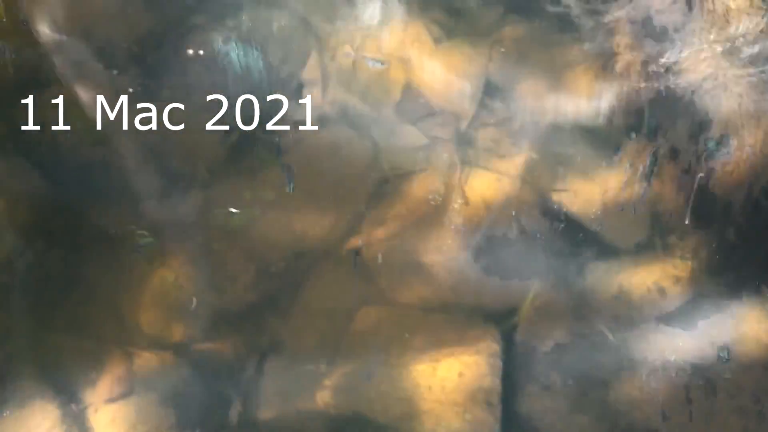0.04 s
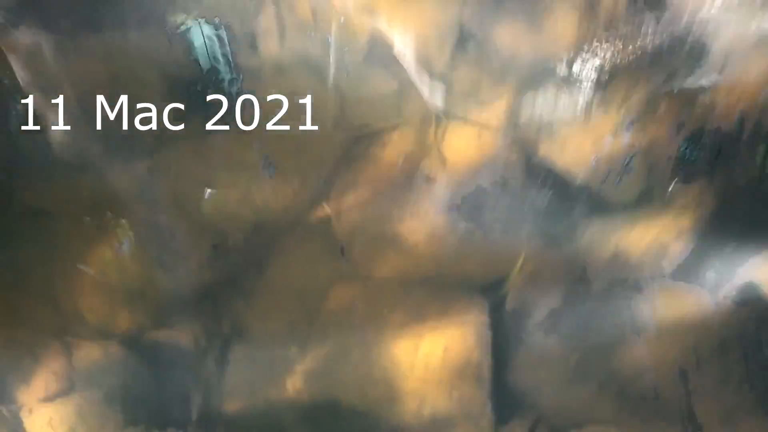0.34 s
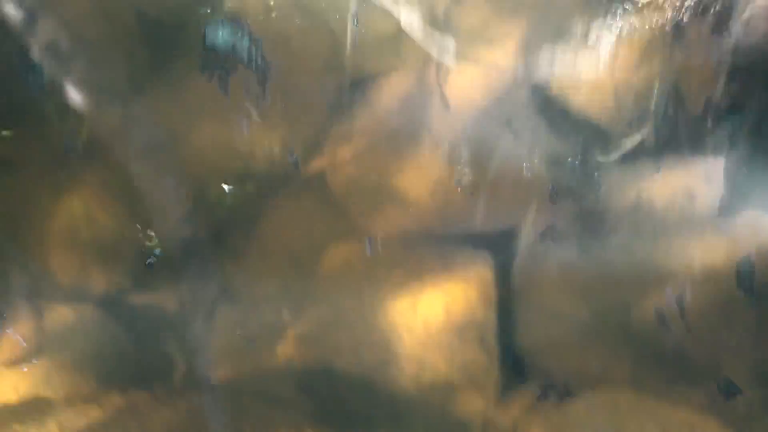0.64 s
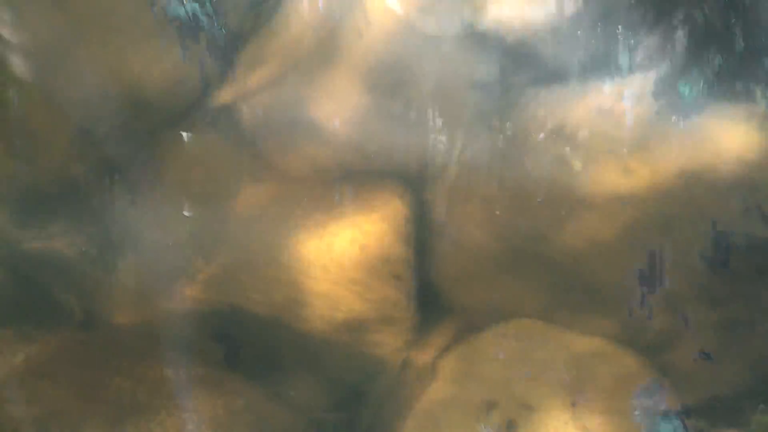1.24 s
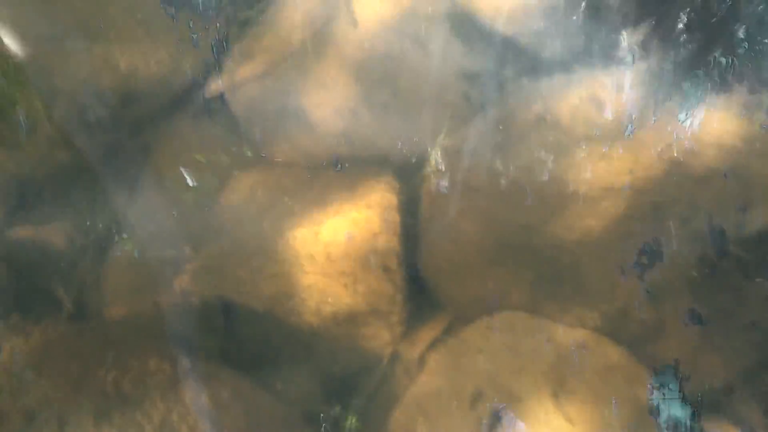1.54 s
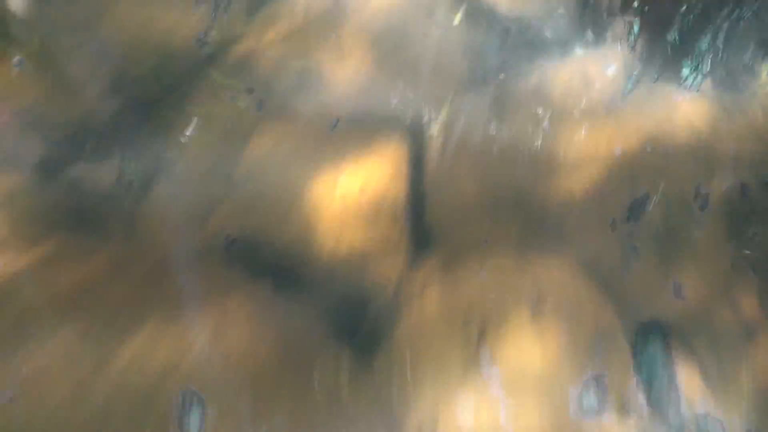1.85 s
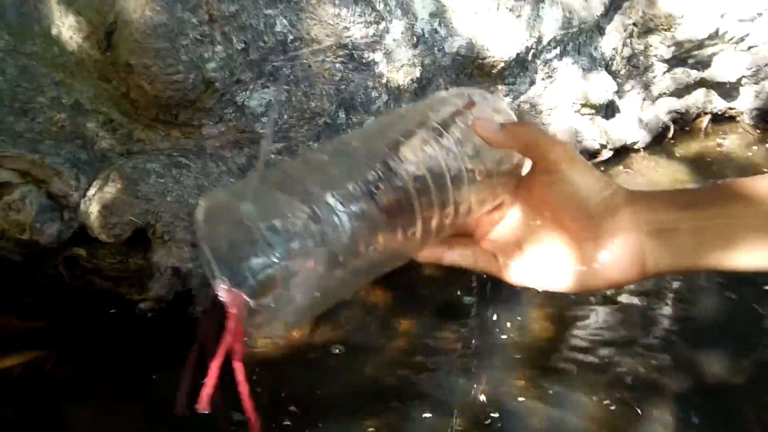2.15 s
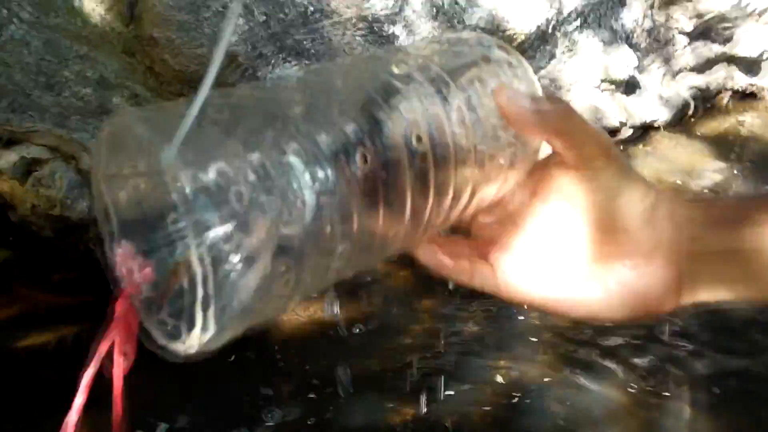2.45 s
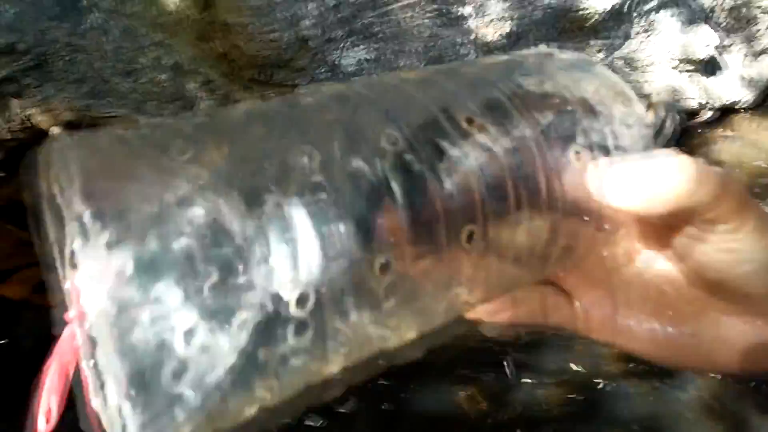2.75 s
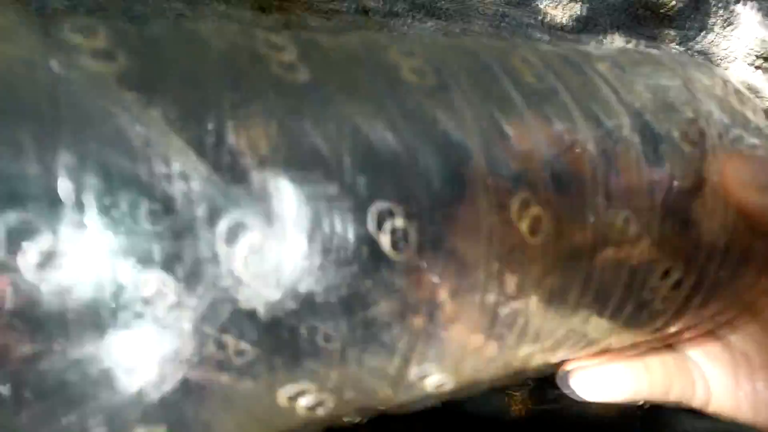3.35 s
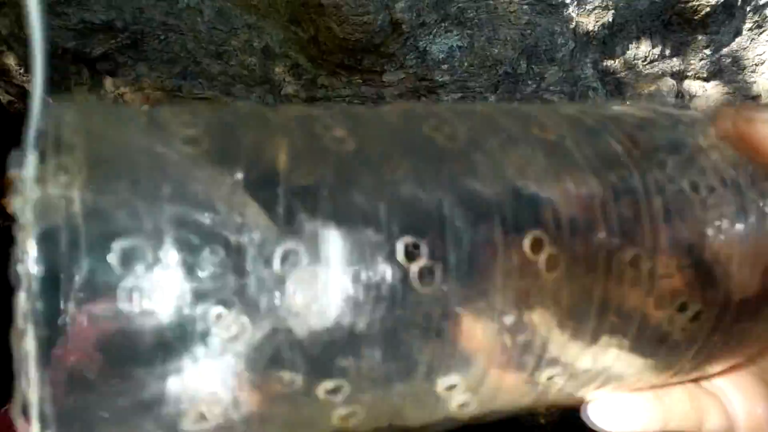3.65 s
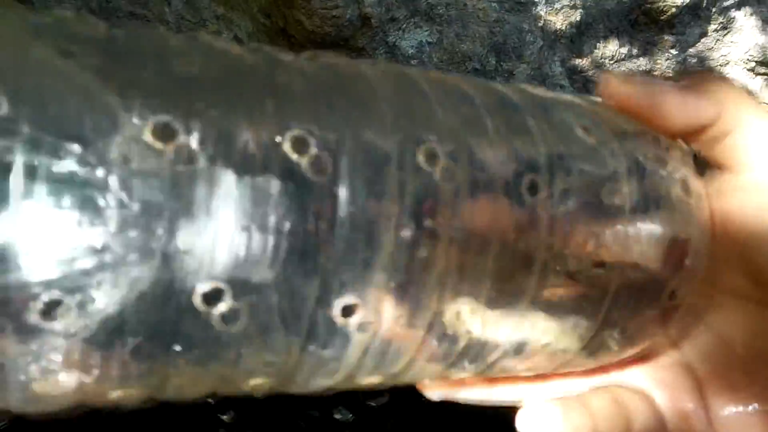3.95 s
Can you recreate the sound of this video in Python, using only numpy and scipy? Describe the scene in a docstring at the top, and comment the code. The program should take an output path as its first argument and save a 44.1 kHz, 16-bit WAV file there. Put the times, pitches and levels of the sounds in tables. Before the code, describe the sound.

A wet plastic bottle is handled beside a forest stream. For two seconds there is faint trickling, a shrill pulsing insect and distant bird whistles. After an instant's dropout at 2 seconds, the bottle is lifted out, gurgling and shedding plinking drops. From 3 to 3.7 seconds it is shaken close to the microphone, with much louder hollow knocks and crackles, followed by a fading spray hiss and a few drips.

```python
"""A shallow forest stream trickles under a pulsing insect and a distant whistling bird.
The sound cuts out for an instant at 2 s; then a plastic bottle trap is lifted out, gurgling as it
drains and shedding drops that plink and tick. It is shaken close to the microphone: the wet shell
knocks and crackles, and a hiss of spray hangs after it."""
import sys
import numpy as np
from scipy import signal
from scipy.fft import rfft, irfft
from scipy.io import wavfile
from scipy.ndimage import uniform_filter1d

SR = 44100
rng = np.random.default_rng(int(sys.argv[2]) if len(sys.argv) > 2 else 0)


def put_to_file(sound):
    """Save the sound as 16-bit audio at rate SR, in the file named by the first command-line argument."""
    columns = np.atleast_2d(sound).T  # one column per channel
    safe = np.clip(columns, -1, 1)
    whole_steps = np.round(safe * 32767)
    wavfile.write(sys.argv[1], SR, whole_steps.astype(np.int16))


N = 176400


def amp(db):
    """Decibels to gain."""
    return 10 ** (np.asarray(db) / 20)


def unit(x):
    """Scale to rms 1."""
    return x / np.sqrt(np.mean(x ** 2) + 1e-20)


def clock(count=N):
    """Seconds at each sample."""
    return np.arange(count) / SR


def level(rows):
    """Gain at each sample from (s, dB) points; silent well outside them."""
    s, db = np.transpose(rows)
    t = clock()
    return amp(np.interp(t, s, db)) * (t > s[0] - .03) * (t < s[-1] + .03)


def colour(points):
    """Gain against frequency from (Hz, dB) points."""
    f, db = np.transpose(points)
    return lambda hz: amp(np.interp(np.log(hz + 1), np.log(f), db))


def hump(hz, centre_hz, octaves):
    """A bell on the log-frequency axis."""
    return np.exp(-.5 * (np.log2((hz + 1) / centre_hz) / octaves) ** 2)


def noise(gain, count=N):
    """Noise of rms 1 with the given gain against frequency."""
    white = rfft(rng.standard_normal(count))
    return unit(irfft(white * gain(np.fft.rfftfreq(count, 1 / SR)), count))


def burst(gain, envelope):
    """Coloured noise under an envelope, carrying the envelope's energy."""
    return unit(noise(gain, count=len(envelope)) * envelope) * np.sqrt(np.mean(envelope ** 2))


def add(track, s, sound):
    """Mix a sound in at a time."""
    part = track[max(round(s * SR), 0):][:len(sound)]
    part += sound[:len(part)]


def echo(x, t60):
    """Diffuse reflections: x through a decaying white tail of unit energy."""
    tail = noise(np.ones_like, count=SR) * amp(-60 * clock(SR) / t60)
    return signal.fftconvolve(x, tail / np.linalg.norm(tail))[:N]


def swells(rows, spectrum):
    """Coloured noise in short bell-shaped swells."""
    out, t = np.zeros(N), clock()
    for s, db, width in rows:
        out += amp(db) * burst(colour(spectrum), np.exp(-.5 * ((t - s) / width) ** 2))
    return out


def shaken_trap():
    """Close to the microphone, each knock rings the thin shell and crackles its wet wall; spray lingers."""
    # Each row: start in seconds, relative body and crackle levels in dB, rise and t60 in seconds,
    # centre of the tone colour in Hz.
    knocks = [(3.052, -29.5, -35.5, 0.0062, 0.046, 1400), (3.064, -28.5, -37, 0.0041, 0.08, 1100),
              (3.0794, -21.5, -35.5, 0.00051, 0.1, 950), (3.090, -24, -26, 0.00067, 0.03, 900),
              (3.099, -21.5, -27, 0.0033, 0.065, 1300), (3.107, -27, -40.5, 0.0017, 0.028, 1100),
              (3.115, -33.5, -27.5, 0.00087, 0.043, 1500), (3.146, -19.5, -55, 0.0007, 0.054, 1780),
              (3.164, -36.5, -67.5, 0.0017, 0.13, 2500), (3.240, -29, -60, 0.0011, 0.01, 1500),
              (3.2747, -23.5, -27, .0015, 0.024, 1600), (3.2919, -20, -30.5, 0.0012, 0.029, 1400),
              (3.301, -28.5, -21.5, 0.0022, 0.024, 1900), (3.348, -41.5, -42.5, .001, 0.047, 1400),
              (3.370, -43, -38, 0.0005, 0.054, 1500), (3.377, -27, -39, 0.0014, 0.058, 1200),
              (3.407, -18.5, -16, 0.00082, 0.025, 2200), (3.42, -37, -36, 0.0017, .03, 900),
              (3.4265, -18, -26.5, 0.0017, 0.055, 1100), (3.443, -26, -23, 0.00032, 0.033, 1600),
              (3.504, -34, -40, 0.0014, 0.023, 1800), (3.561, -32.5, -38.5, 0.0036, 0.054, 2300),
              (3.6532, -27.5, -33, 0.00046, 0.042, 1300), (3.657, -32, -60.5, 0.0013, .05, 1600),
              (3.6682, -11.5, -16, 0.0014, 0.027, 1864), (3.7137, -28.5, -34, 0.00077, 0.049, 1100),
              (3.817, -57, -53, 0.015, 0.083, 1970)]
    # Each row: frequency in Hz, relative level in dB, t60 in seconds.
    shell_modes = [(593.4, -13, 0.12), (766, -2, 0.075), (840, -4, 0.035), (974, -9.5, 0.071),
                   (1350, -8.5, 0.072), (1645, -3.5, 0.039), (1980, 2.5, 0.026), (2380, 2.5, 0.05),
                   (2690, -23.5, 0.029), (2970, -15.5, .04)]
    # Each row of these spectra: frequency in Hz, relative level in dB.
    body_colour = [(150, -27), (420, -31), (600, -9), (780, -4.5), (1050, 1.5), (1200, -8), (1450, 1.5),
                   (1900, -13), (2450, 2), (2800, -14.5), (3200, -4.5), (4200, -28.5), (8000, -41)]
    crackle_colour = [(500, -38.5), (2500, -8.5), (4000, -3), (5400, 4), (6900, -2), (8300, 2.5),
                      (10000, -2), (12000, -9), (15000, -15)]
    spray_colour = [(300, -7), (800, 1), (2400, 1.5), (3500, -4.5), (5300, 4), (6800, 2.5), (8700, 11.5),
                    (11000, 2), (14500, -2)]
    # Each row: time in seconds, gain on the spray in dB.
    spray_fade = [(3, 1.5), (3.84, -3), (3.92, -8.5), (4, -25)]
    hold_s, spray_t60_s = 0.0011, 0.65
    scatter_db, detune, grain_db = 2.5, .004, 2
    out, spray = np.zeros(N), np.zeros(N)
    t, spray_t = clock(count=6000), clock(count=32768)
    linger = (1 - np.exp(-spray_t / 0.0036)) * amp(-60 * spray_t / spray_t60_s)
    for s, body_db, crackle_db, rise, t60, centre_hz in knocks:
        onset = np.minimum(t / rise, 1)
        envelope = onset * amp(-60 * np.maximum(t - rise - hold_s, 0) / t60)
        emphasis = lambda hz: hump(hz, centre_hz, octaves=1.16)
        body = burst(lambda hz: colour(body_colour)(hz) * emphasis(hz), envelope)
        ring = np.zeros_like(t)
        for hz, db, mode_t60 in shell_modes:
            decay = amp(db + rng.normal(0, scatter_db) - 60 * t / mode_t60)
            cycles = hz * rng.normal(1, detune) * t + rng.random()
            ring += decay * emphasis(hz) * np.sin(2 * np.pi * cycles)
        grain = unit(amp(grain_db * noise(lambda hz: hz < 1200, count=len(t))))
        crackle = burst(colour(crackle_colour), envelope * grain)
        knock = amp(-4) * body + amp(-10) * onset * ring
        add(out, s, amp(body_db) * knock + amp(crackle_db - 2) * crackle)
        spray_gain = np.hypot(amp(crackle_db), amp(body_db - 16))
        add(spray, s, spray_gain * burst(colour(spray_colour), linger))
    return out + amp(-22) * level(spray_fade) * spray


def hand_on_trap():
    """The shell sings as it slides in the hand and thumps softly under each push."""
    # Each row: time in seconds, level in dB.
    slide = [(3.146, -65), (3.17, -35.5), (3.19, -67), (3.225, -41), (3.245, -67)]
    # Each row: peak time in seconds, level in dB, half-width in seconds.
    pushes = [(3.066, -36, 0.0095), (3.082, -67, 0.0079), (3.104, -42.5, .012), (3.172, -50.5, 0.02),
              (3.298, -57.5, 0.0085), (3.426, -40.5, 0.015), (3.537, -62.5, 0.0077), (3.650, -42, 0.0028),
              (3.669, -47, 0.012)]
    # Each row: frequency in Hz, relative level in dB.
    push_colour = [(25, -32.5), (70, -12), (150, -2.5), (300, -6), (450, -12), (900, -18.5)]
    singing = level(slide) * noise(lambda hz: hump(hz, centre_hz=2330, octaves=.04))
    return singing + swells(pushes, push_colour)


def draining():
    """Water runs from the trap's holes: a splashing hiss and a narrow, hollow gurgle."""
    # Each row: time in seconds, level in dB.
    splash_levels = [(2.02, -66), (2.06, -56.5), (2.10, -43), (2.17, -55), (2.3, -53.5), (2.4, -70.5),
                     (2.47, -60), (2.7, -66.5), (2.82, -97), (2.93, -63.5), (3.02, -79)]
    gurgle_levels = [(2.026, -69), (2.033, -47), (2.06, -43.5), (2.095, -34.5), (2.125, -41), (2.16, -49.5),
                     (2.21, -69), (2.26, -49), (2.35, -67), (2.5, -88), (2.7, -71.5)]
    # Each row: frequency in Hz, relative level in dB.
    splash_colour = [(500, -14), (1000, 2.5), (2200, -4.5), (3000, -7), (4200, -24), (5000, -1),
                     (5800, -16), (7000, 1), (9000, 4.5), (11000, -3.5), (14500, -12)]
    gurgle_colour = [(600, -31), (1200, -18.5), (1550, -4), (1740, 4.5), (1830, 5.5), (1930, -7),
                     (2300, -25.5), (3500, -68)]
    spatter = 1 + .18 * noise(lambda hz: hz < 250)
    splash = level(splash_levels) * unit(spatter * noise(colour(splash_colour)))
    return splash + level(gurgle_levels) * noise(colour(gurgle_colour))


def drips():
    """Drops trap bubbles whose gliding plinks echo off the rocks; others tick on stone and plastic."""
    # Each row: start in seconds, relative level in dB, starting pitch in Hz,
    # glide in octaves per second, decay time in seconds.
    bubble_drops = [(.235, -63.5, 1346, 20, 0.018), (.275, -57, 1990, 22, 0.017),
                    (.295, -62, 1240, 8, 0.011), (.39, -65.5, 3640, 5, 0.024),
                    (.515, -60, 2300, 15, 0.0099), (.72, -62.5, 1527, 2.5, 0.016),
                    (.765, -62, 2180, -1, .012), (.843, -59.5, 2180, 4, 0.011), (.905, -54, 875, -6, 0.025),
                    (1.228, -56.5, 922, 1.5, 0.018), (2.219, -37.5, 1066, 35.5, 0.017),
                    (2.397, -48.5, 976, 7.5, .022), (2.425, -56.5, 1254, 14.5, 0.018),
                    (2.558, -59.5, 1690, 15, 0.0061), (2.574, -55.5, 1830, 26, 0.0083),
                    (2.675, -55.5, 1266, 12, 0.0071), (2.86, -58.5, 773, 4, .014),
                    (3.858, -45.5, 776, 9, 0.0046), (3.881, -44.5, 1483, 9.5, 0.0038),
                    (3.931, -48, 1270, 13.5, 0.0036)]
    # Each row: start in seconds, level in dB, band centre in Hz.
    hard_drops = [(2.143, -49.5, 5000), (2.197, -40, 9000), (2.247, -46.5, 5000), (2.273, -50.5, 3300),
                  (2.307, -56.5, 5500), (2.332, -56.5, 3600), (2.433, -57, 8000), (2.549, -49, 9500),
                  (2.761, -64, 9100), (2.854, -64, 9000), (2.909, -55, 10200), (2.938, -47, 3700),
                  (2.94, -45.5, 8600), (3.243, -43, 9000)]
    tick_t60_s, tail_t60_s = 0.049, 0.99
    plinks, ticks, t = np.zeros(N), np.zeros(N), clock(count=16384)
    for s, db, hz, glide, decay_s in bubble_drops:
        phase = 2 * np.pi * np.cumsum(hz * 2 ** np.minimum(glide * t, 1)) / SR
        envelope = (1 - np.exp(-t / 0.00082)) * np.exp(-(t / decay_s) ** 2)
        add(plinks, s, amp(db + 1.5) * envelope * np.sin(phase))
    tick_decay = amp(-60 * t / tick_t60_s) + amp(-25 - 60 * t / tail_t60_s)
    for s, db, centre_hz in hard_drops:
        add(ticks, s, amp(db) * burst(lambda hz: hump(hz, centre_hz, octaves=0.31), tick_decay))
    return ticks + plinks + amp(-7.5) * echo(plinks, t60=0.32)


def stream():
    """Shallow water: a soft wash and many small bubbles rising in pitch, blurred by the rocky bank."""
    # Each row: time in seconds, relative level in dB.
    flow = [(0, -70.5), (.3, -66), (.6, -67.5), (1, -66.5), (1.6, -68), (2, -68.5), (2.5, -74.5), (3, -68),
            (3.5, -82.5), (4, -70.5)]
    # Each row: frequency in Hz, relative level in dB.
    wash_colour = [(30, 2), (100, 4.5), (230, -10.5), (430, -3), (560, -7), (850, -1.5), (1300, -10.5),
                   (2200, -6.5), (3300, -20), (4700, -19.5), (6000, -18), (14000, -45)]
    bubbles_per_s, centre_hz, span_octaves = 160, 1348, 2.01
    bubbles, t = np.zeros(N), clock(count=2000)
    for when, pitch, size in rng.random((int(bubbles_per_s * N / SR), 3)):
        hz = centre_hz * 2 ** (span_octaves * (pitch - .5))
        age = t * hz / 9  # counted in cycles, so high bubbles die sooner
        gain = amp(-7 * np.log(1 - .98 * size))  # many faint, a few loud
        chirp = 1 + 0.027 * np.minimum(age, 5)
        add(bubbles, when * N / SR, gain * age * np.exp(-2 * age) * np.sin(2 * np.pi * hz * t * chirp))
    blurred = unit(.6 * bubbles + echo(bubbles, t60=.25))
    wash = noise(colour(wash_colour))
    return level(flow) * (amp(-0.5) * wash + amp(-2.5) * blurred)


def insects():
    """One insect pulses in a narrow shrill band; another rasps above it, over a broad high hiss."""
    # Each row: time in seconds, level in dB.
    hiss_levels = [(0, -60), (.7, -62.5), (1.2, -65), (1.54, -65), (1.64, -68), (1.86, -78), (1.96, -62),
                   (2.03, -75), (2.8, -76), (4, -80)]
    rasp_levels = [(0, -59), (.65, -61.5), (.95, -62), (1.2, -64.5), (1.53, -68.5), (1.62, -88.5)]
    # Each row: frequency in Hz, relative level in dB.
    hiss_colour = [(2500, -2.5), (4000, -16.5), (6000, -12), (7200, -2.5), (8800, 6), (10500, 2),
                   (12000, -8), (14200, -2.5)]
    rasp_colour = [(9000, -23), (10500, -5), (11600, 0.5), (12200, -8), (12750, 3), (13300, 0),
                   (14000, 1.5), (14400, -2.5)]
    # Each row: peak time in seconds, pitch in Hz, level in dB.
    pulses = [(0.159, 8280, -53), (.39, 8300, -53), (.605, 8290, -52), (0.837, 8330, -54),
              (1.061, 8300, -56.5), (1.275, 8300, -54), (1.511, 8290, -54.5), (1.741, 8290, -61),
              (1.962, 8250, -59), (2.202, 8700, -56), (2.361, 9140, -58.5), (2.482, 8690, -58),
              (2.562, 4480, -79), (2.678, 8820, -67.5), (2.769, 4500, -79.5), (2.92, 8600, -71),
              (3.5, 8600, -66), (3.722, 8900, -73), (3.921, 8900, -71.5)]
    rasps_per_s, pulse_width_s, song_width_hz = 23, 0.049, 120
    out = level(hiss_levels) * noise(colour(hiss_colour))
    beats = rasps_per_s * np.cumsum(1 + 0.27 * noise(lambda hz: hz < 8)) / SR
    flutter = 1 + .55 * np.sin(2 * np.pi * beats)
    out += level(rasp_levels) * flutter * noise(colour(rasp_colour))
    from_peak = clock(count=16384)
    from_peak -= from_peak.mean()
    envelope = np.exp(-.5 * (from_peak / pulse_width_s) ** 2)
    for s, song_hz, db in pulses:
        pulse = burst(lambda hz: 1 / (1 + ((hz - song_hz) / song_width_hz) ** 2 / 2), envelope)
        add(out, s + from_peak[0], amp(db) * pulse[from_peak > -s])
    return out


def bird():
    """Wavering, gliding whistles from far off, smeared by the forest."""
    # Each row: start and length in seconds, first and last pitch in Hz, relative level in dB.
    whistles = [(0, 0.0854, 2410, 2283, -63), (0.138, 0.02, 1838, 2114, -62.5),
                (0.907, 0.1, 2565, 2608, -62), (.99, 0.021, 1567, 1655, -66.5),
                (1.02, 0.069, 2610, 2884, -65.5), (1.07, 0.055, 2047, 2476, -59),
                (1.113, 0.014, 1880, 1990, -60), (1.246, 0.034, 3000, 2430, -61),
                (1.26, 0.088, 2614, 2307, -60), (1.358, 0.028, 1627, 2175, -63.5),
                (1.416, 0.077, 2420, 2270, -66.5), (1.547, 0.053, 2225, 2417, -64.5),
                (1.595, 0.029, 2640, 3090, -71), (1.623, 0.016, 2110, 2000, -63),
                (1.658, 0.029, 1990, 1810, -66)]
    song = np.zeros(N)
    for s, length, start_hz, end_hz, db in whistles:
        progress = np.linspace(0, 1, int(length * SR))
        waver = 1 + .02 * noise(lambda hz: hz < 220, count=SR)[:len(progress)]
        pitch = (start_hz + (end_hz - start_hz) * progress) * waver
        arch = np.abs(np.sin(np.pi * progress)) ** .5
        add(song, s, amp(db + 10.5) * arch * np.sin(2 * np.pi * np.cumsum(pitch) / SR))
    return 0.63 * song + echo(song, t60=0.57)


def handling_rumble():
    """Faint, low bumps of handling noise."""
    # Each row: peak time in seconds, level in dB, half-width in seconds.
    bumps = [(.05, -63, 0.032), (.27, -58.5, 0.043), (.49, -59, 0.014), (.715, -59, 0.0067),
             (.775, -57.5, 0.017), (1.83, -61.5, 0.022), (1.89, -63, 0.0064), (1.955, -58.5, 0.0073),
             (2.09, -67, 0.037)]
    # Each row: frequency in Hz, relative level in dB.
    bump_colour = [(20, -14), (35, -26), (55, -8.5), (110, -5), (200, -22), (500, -33), (1000, -60)]
    return swells(bumps, bump_colour)


def scene():
    """One microphone at the stream's edge, with the trap close by and the forest behind it."""
    trap = shaken_trap() + hand_on_trap() + draining() + drips()
    return (trap + stream() + insects() + bird() + handling_rumble())[None]


def record(dry):
    """A brief dropout, then the microphone's low cut and the band limit."""
    mute_from_s, mute_to_s = 2.014, 2.030
    low_cut_hz, top_hz = 29, 14350
    t, hz = clock(), np.fft.rfftfreq(2 * N, 1 / SR)
    gate = uniform_filter1d(1. * ((t < mute_from_s) | (t > mute_to_s)), size=60)
    low_cut = hz ** 2 / np.hypot(hz ** 2, low_cut_hz ** 2)
    return irfft(rfft(dry * gate, 2 * N) * low_cut * (hz < top_hz))[:, :N]


dry = scene()
out = record(dry)
put_to_file(out)
```